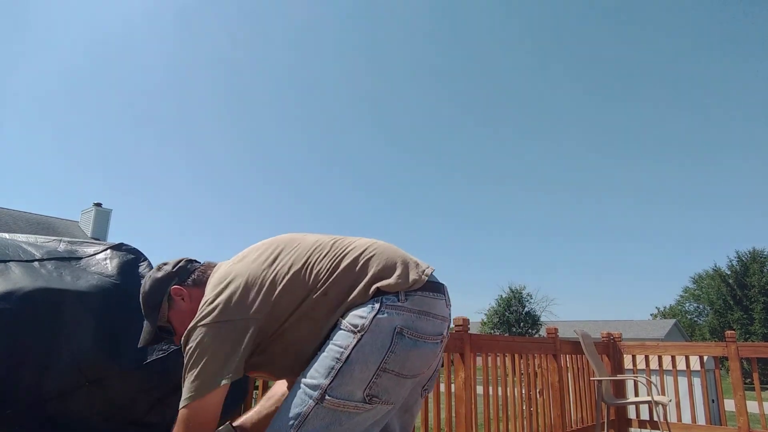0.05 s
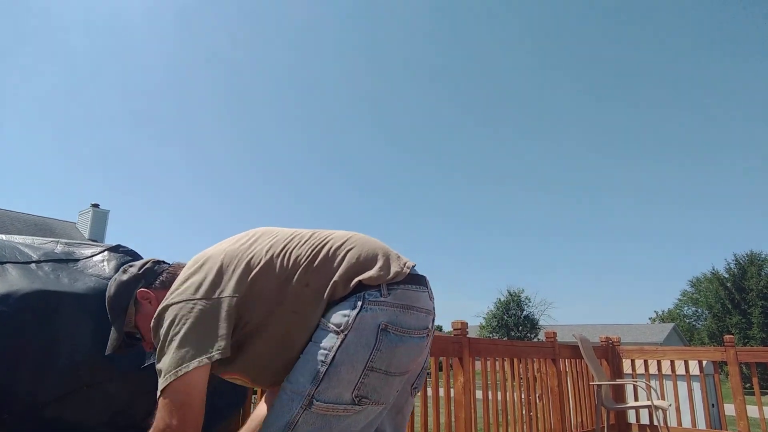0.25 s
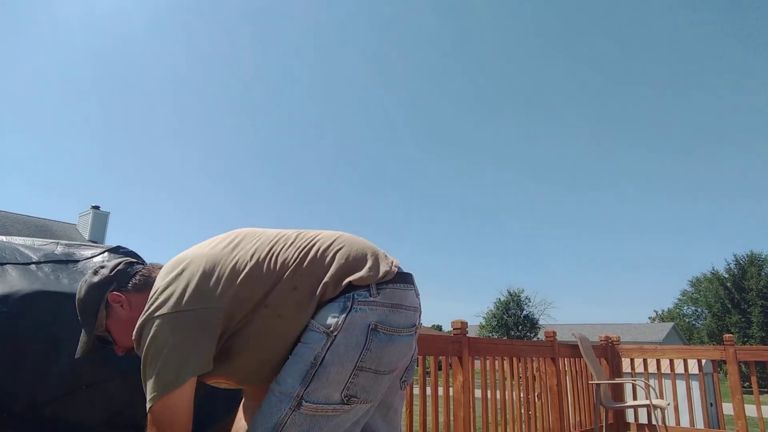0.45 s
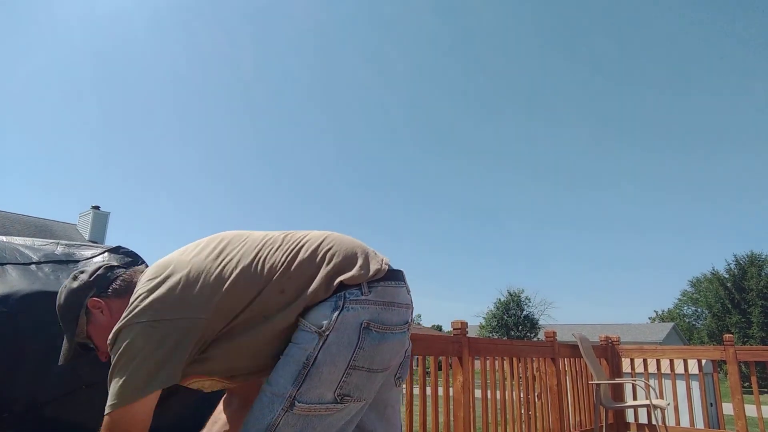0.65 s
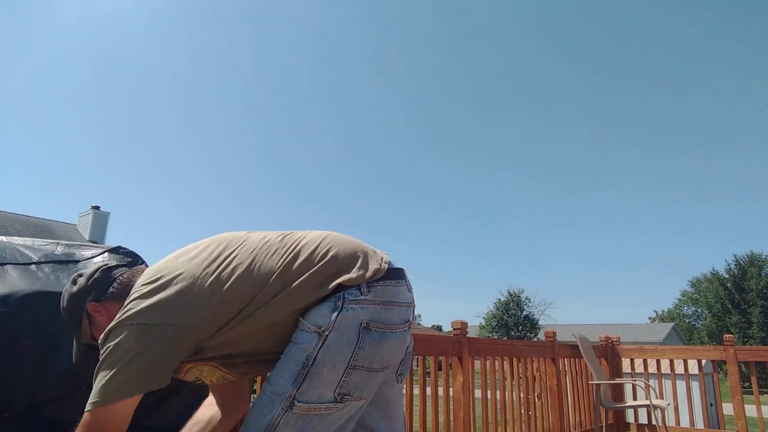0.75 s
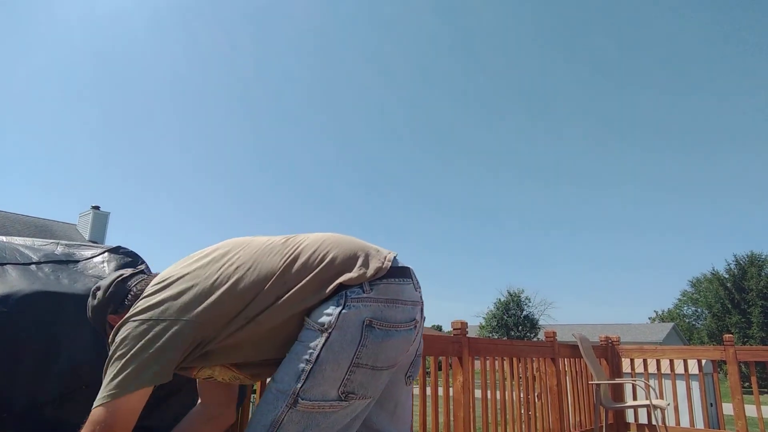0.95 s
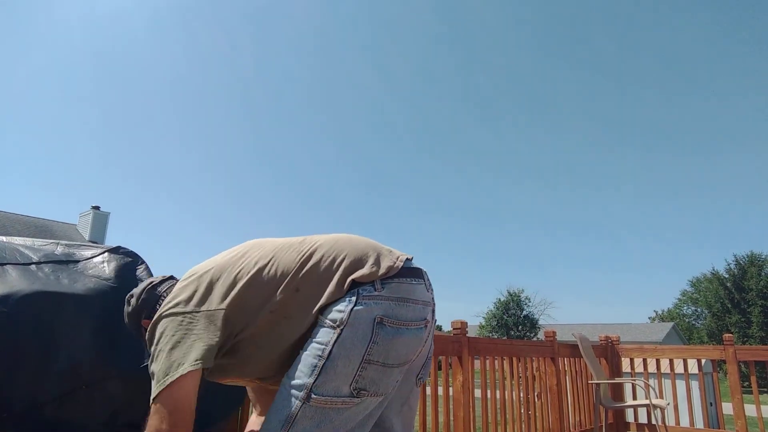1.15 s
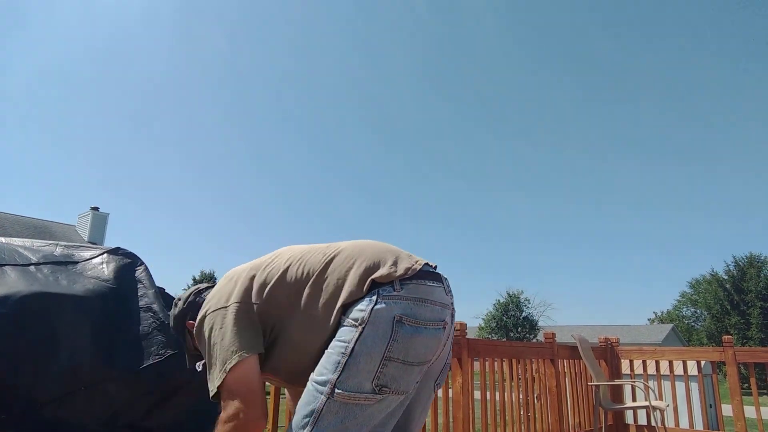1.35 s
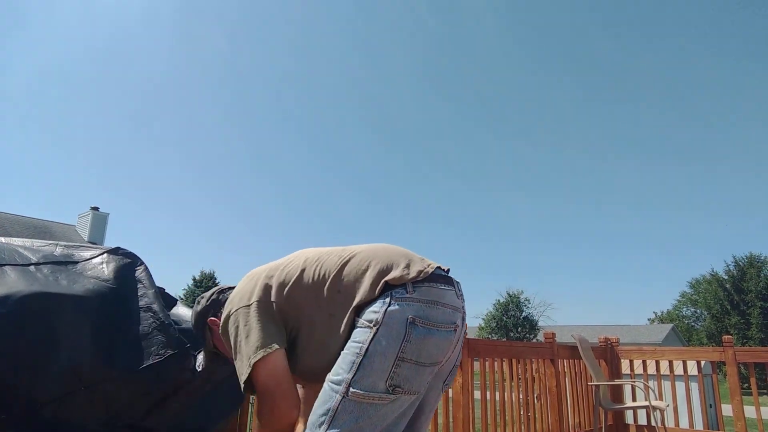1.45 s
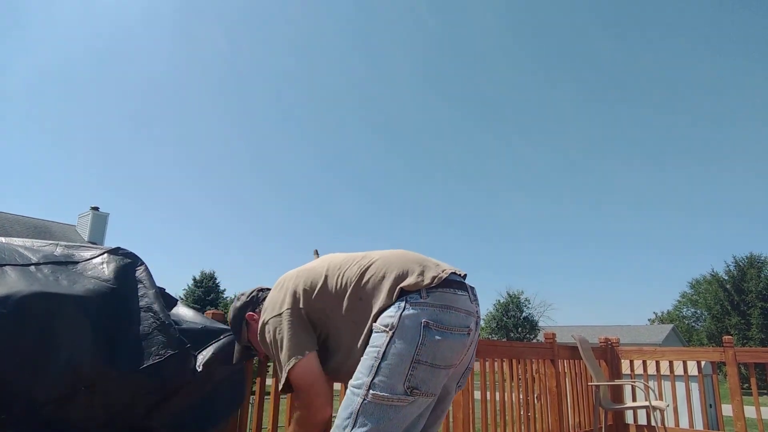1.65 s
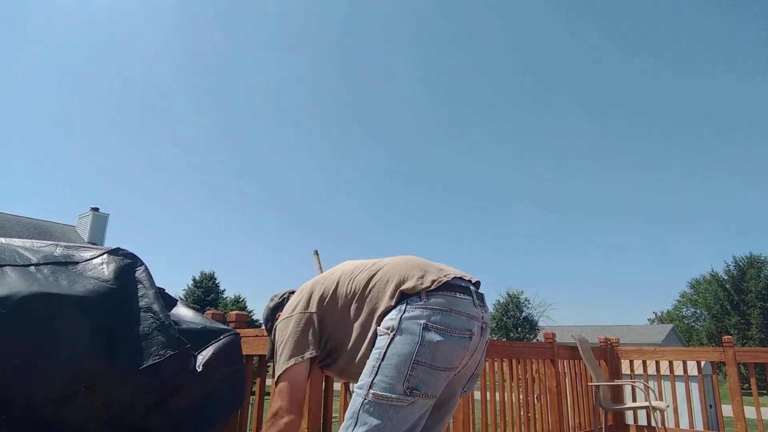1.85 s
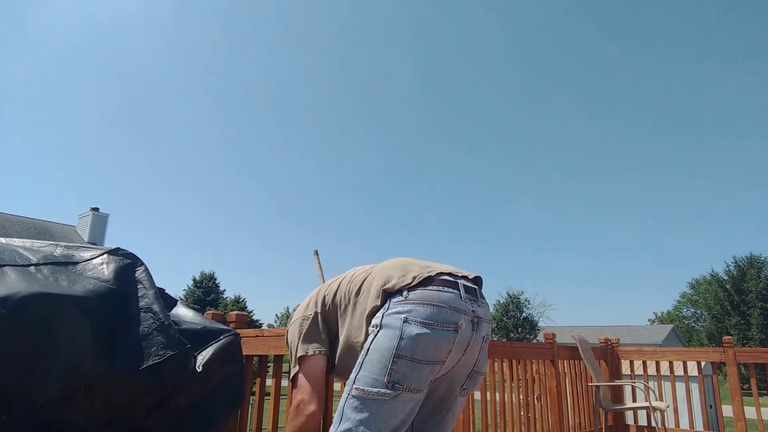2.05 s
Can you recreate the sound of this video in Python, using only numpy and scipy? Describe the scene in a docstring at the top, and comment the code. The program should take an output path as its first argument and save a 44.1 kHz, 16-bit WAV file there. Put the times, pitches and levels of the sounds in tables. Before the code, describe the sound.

A heavy metal drum knocks and rumbles across wooden deck boards outdoors, with faint bird chirps

```python
"""A heavy metal drum is tipped and rolled over wooden deck boards outdoors.
Its rim knocks are clicked resonators with noise tails, bright cracks and short snaps.
Between knocks it rumbles (randomly shaken deck modes, low noise) and scrapes (coloured fine grains).
Birds chirp far off as blurred gliding tones over a soft noise of air.
Two microphone ports are cross-fed with a short delay into left and right."""
import sys
import numpy as np
from scipy import signal
from scipy.fft import rfft, irfft
from scipy.io import wavfile

SR = 44100
rng = np.random.default_rng(int(sys.argv[2]) if len(sys.argv) > 2 else 0)


def wav_out(sig):
    """Save sig, one row per channel (or a flat mono array), as 16-bit PCM at SR to the path in sys.argv[1]."""
    wavfile.write(sys.argv[1], SR, np.round(np.clip(np.atleast_2d(sig).T, -1, 1) * 32767).astype(np.int16))


def voltage_ratio(decibels):
    """Convert decibels (scalar or array-like) to amplitude ratios, 20 dB per decade."""
    exponent = np.asarray(decibels, float) / 20
    return 10 ** exponent


N = 92610

# rim knocks on the boards, before each layer's own trim:
# (t/s, level/dB, crack re knock/dB, tilt/dB per octave, favoured pitch f/Hz)
KNOCKS = [(0.222, -5, -20.5, 0.5, 272), (0.261, -17, -14, 1.5, 272), (0.291, -15.5, -30, -2.5, 483),
          (0.316, -11, -32, 1, 850), (0.331, -15, -22, -2, 295), (0.391, -24.5, -48, -1, 540),
          (0.414, -45, -36, -10, 470), (0.577, -31.5, -25, -6, 180), (1.011, -47, -30, 6, 167),
          (1.098, -45.5, -30, -11.5, 159), (1.162, -26, -24.5, -6, 480), (1.186, -8, -50, 1.3, 480),
          (1.199, -3, -24, 2.5, 290), (1.249, -15.5, -20, -1.5, 475), (1.309, -25, -22, -5.5, 192),
          (1.355, -27, -52, -3.5, 630), (1.595, -18.5, -9, 6, 490), (1.607, -13, -33, 0.5, 294),
          (1.63, -12.5, -11, 5.5, 670), (1.654, -4.5, -23.5, -0.5, 257), (1.664, -7.5, -27, 2.2, 607),
          (1.679, -15.5, -44, -5.5, 316), (1.710, -17.5, -33, 4.5, 670), (1.719, -13, -30, -3.5, 600),
          (1.778, -7.5, -17, 0, 607), (1.788, -5, -22, -0.5, 270), (1.804, -17, -12.5, -3.5, 272),
          (1.862, -19, -37, -3.5, 383), (1.888, -21, -22.5, -4, 575), (1.946, -26, -13.5, 4.5, 264)]
# resonances of boards and drum together: (f/Hz, relative level/dB, t60/s)
DECK_MODES = [(62.6, -25.5, 0.67), (92.44, -8.5, 0.68), (153, -21.5, 0.45), (186.8, -2, 0.089),
              (272, -3.5, 0.12), (354, -13.5, 0.37), (414, -8, 0.12), (505.4, -5, 0.06), (598, -7.5, 0.051),
              (692.7, -9.5, 0.072), (833, -6.5, 0.021), (977, -3.5, 0.028), (932, -8.5, 0.011),
              (1215, -7.5, 0.03), (1313, -3, 0.022), (1508, -10.5, 0.07)]
# second port against first: (f/Hz, likeness 0..1, level/dB, cross-feed gain 0..1)
PORTS = [(40, 0.7, -6.5, 1), (110, 0.7, -2.5, 0.78), (272, 0.96, -2.5, 0.81), (560, 0.58, 2.5, 0.91),
         (1700, 0.043, 0.5, 1), (3350, 0.02, 3.5, 0.48), (5270, 0.011, 6, 0.78), (9800, 0.021, -2.5, 0.55),
         (17000, 0.075, -8, 0.29)]
TILT_HZ = 480  # pivot of every knock's tilt
BUILD_S = 0.00136  # knock, tail and crack start this long after the table time


def rms_one(x):
    """Scale to rms 1."""
    return x / np.sqrt(np.mean(x ** 2) + 1e-20)


def at_hz(points, hz, axis=1):
    """Read a table column at hz, interpolating over log frequency."""
    points = np.array(points)
    return np.interp(np.log(hz), np.log(points[:, 0]), points[:, axis])


def in_time(rows):
    """Gain curve through (t/s, level/dB) points, straight in dB."""
    s, db = np.transpose(rows)
    return voltage_ratio(np.interp(np.arange(N) / SR, s, db))


def spectrum_hz():
    """Frequencies of the whole-length spectrum, floored at 10 Hz."""
    return np.maximum(np.fft.rfftfreq(N, 1 / SR), 10)


def colour(x, points):
    """Shape steady noise by a (f/Hz, level/dB) table; rms 1."""
    return rms_one(irfft(rfft(x) * voltage_ratio(at_hz(points, spectrum_hz())), N))


def ring(clicks, hz, t60):
    """A two-pole resonator: a unit click sets a sine ringing from height 1; t60 is at least 5 ms."""
    r = voltage_ratio(-60 / (max(t60, 0.005) * SR))
    w = 2 * np.pi * hz / SR
    return signal.lfilter([0, np.sin(w)], [1, -2 * r * np.cos(w), r * r], clicks + 1e-18)


def grains(per_s):
    """Random clicks of uneven size and either sign, two unrelated draws."""
    size_db = 3 * np.minimum(rng.exponential(1, (2, N)), 5)
    sizes = voltage_ratio(size_db) * rng.choice([-1, 1], (2, N))
    return sizes * (rng.random((2, N)) < per_s / SR)


def dying(starts, t60):
    """Envelope that jumps at each (t/s, level/dB), then dies exponentially, powers adding."""
    power = np.zeros(N)
    for s, db in starts:
        power[int(s * SR)] += voltage_ratio(2 * db)
    decay = voltage_ratio(-120 / (max(t60, 0.003) * SR))
    return np.sqrt(signal.lfilter([1], [1, -decay], power + 1e-18))


def air():
    """Soft steady air noise."""
    # spectrum: (f/Hz, relative level/dB)
    air_colour = [(30, -10), (100, 17), (300, -6), (1000, -6.5), (2500, -19), (5000, -31.5), (9000, -26),
                  (16000, -19)]
    return voltage_ratio(-57) * colour(rng.standard_normal((2, N)), air_colour)


def birds():
    """Far chirps: gliding tones blurred by echoes into narrow noise."""
    # (start t/s, length/s, start f/Hz, end f/Hz, level/dB, blur width/Hz)
    chirps = [(0, 0.096, 3360, 3156, -45.5, 400), (0.569, 0.06, 4800, 4830, -63.5, 110),
              (0.609, 0.065, 3380, 3400, -61.5, 110), (0.647, 0.051, 3680, 4000, -59, 141),
              (1.563, 0.041, 3900, 5280, -56.5, 303)]
    clear_hz = 70  # a chirp this narrow keeps as much steady tone as blur
    out, t = np.zeros((2, N)), np.arange(N) / SR
    for start, length, hz0, hz1, db, width_hz in chirps:
        progress = np.clip((t - start) / length, 0, 1)
        lowpass = signal.butter(2, width_hz, fs=SR, output="sos")
        blur = rms_one(signal.sosfilt(lowpass, rng.standard_normal((2, N))))
        swell = voltage_ratio(db) * np.sin(np.pi * progress)
        glide_hz = hz0 + (hz1 - hz0) * progress
        tone = np.sin(2 * np.pi * np.cumsum(glide_hz) / SR)
        out += swell * (clear_hz / width_hz + blur) * tone
    return out


def rolling():
    """Uneven contacts shake the deck modes; a low lumpy rumble swells below."""
    # level of the shaken modes: (t/s, level/dB)
    roll_level = [(0.0, -52.5), (0.39, -48), (0.64, -55.5), (0.78, -58), (1.05, -61.5), (1.25, -40.5),
                  (1.64, -62.5), (1.77, -29), (1.79, -36.5), (1.92, -44), (2.0, -49.5), (2.1, -47)]
    # low rumble before its trim: (t/s, level/dB)
    boom_level = [(0.0, -45.5), (0.2, -48), (0.23, -40), (0.3, -45.5), (0.33, -33), (0.42, -52.5),
                  (0.95, -61), (0.97, -48), (1.02, -41.5), (1.04, -45), (1.16, -44.5), (1.19, -39.5),
                  (1.32, -63), (1.44, -65), (1.57, -65), (1.64, -67), (1.66, -49), (1.78, -38.5),
                  (2.1, -60)]
    # spectrum of the low rumble: (f/Hz, relative level/dB)
    boom_colour = [(20, -41), (45, 1.5), (100, 5), (170, -3), (300, -25), (1000, -45.5)]
    contacts = grains(250)  # per second
    rumble = 0
    for k, (hz, db, t60) in enumerate(DECK_MODES[3:]):
        # here each mode rings half as long
        rumble = rumble + (-1) ** k * voltage_ratio(db) * ring(contacts, hz, 0.5 * t60)
    boom = voltage_ratio(6.5) * in_time(boom_level) * colour(rng.standard_normal((2, N)), boom_colour)
    return in_time(roll_level) * rms_one(rumble) + boom


def scraping():
    """Fine grit under the rim: quick attack, hold, release; with a faint treble hiss."""
    # (start t/s, hold from start/s, level/dB, release/dB per s)
    scrapes = [(0.217, 0.077, -47.5, 165), (0.295, 0.045, -44.5, 281), (1.182, 0.047, -39.5, 176),
               (1.598, 0.044, -33.5, 202), (1.704, 0.033, -46.5, 97), (1.763, 0.037, -43, 175),
               (1.919, 0.012, -55, 179), (2.027, 0.0081, -73, 295), (2.069, .03, -52.5, 197)]
    # spectrum from 1500 Hz up: (f/Hz, relative level/dB)
    grit_colour = [(1500, 5), (3000, 5), (5000, -3), (9000, -14.5), (13000, -3), (16000, -6.5)]
    # treble hiss, three stretches joined: (t/s, level/dB)
    hiss_level = [
        [(0.0, -49), (0.038, -61), (0.2, -53)],
        [(0.45, -63.5), (0.708, -64.5), (1.048, -61.5), (1.15, -58)],
        [(1.33, -68), (1.38, -71), (1.47, -66.5), (1.58, -62)],
    ]
    attack_s = 0.01
    t, level = np.arange(N) / SR, np.zeros(N)
    for start, hold, db, release_db in scrapes:
        attack = np.clip((t - start) / attack_s, 0, 1)
        level += attack * voltage_ratio(db - release_db * np.maximum(t - start - hold, 0))
    grit = colour(grains(2500), [(600, 11)] + grit_colour)
    hiss = colour(rng.standard_normal((2, N)), [(600, 9.3)] + grit_colour)
    return level * grit + in_time(sum(hiss_level, [])) * hiss


def tails():
    """Dense ringing after the knocks: half-octave noise bands, each swelling in and dying at its own speed."""
    # band levels before the trim: (f/Hz, level/dB)
    tail_level = [(40, -2), (100, 2), (300, 2.5), (700, -7.5), (1500, -12), (2500, -36), (6000, -41),
                  (16000, -55.5)]
    # decay: (f/Hz, t60/s)
    tail_t60 = [(40, 0.44), (160, 0.49), (420, 0.25), (1100, 0.12), (3000, 0.2), (16000, 0.031)]
    rise_cycles = 0.93  # slower swell in lower bands
    edges = 35 * 2 ** np.arange(0, 9, 0.5)
    white = rng.standard_normal((2, 2, N))  # neighbouring bands take unrelated noise
    out = 0
    for k, (low, high) in enumerate(zip(edges, edges[1:])):
        hz = np.sqrt(low * high)
        bandpass = signal.butter(2, [low, high], "band", fs=SR, output="sos")
        band = signal.sosfilt(bandpass, white[k % 2])
        octaves = np.log2(hz / TILT_HZ)
        starts = [(s + BUILD_S, db + tilt_db * octaves) for s, db, _, tilt_db, _ in KNOCKS]
        level = dying(starts, at_hz(tail_t60, hz))
        r = np.exp(-2 * hz / (rise_cycles * SR))
        swell = signal.lfilter([(1 - r) ** 2], [1, -2 * r, r * r], level)
        out = out + voltage_ratio(at_hz(tail_level, hz)) * band * swell
    return voltage_ratio(-0.9) * out


def cracks():
    """Bright noise bursts at all but the dull, low-pitched knocks."""
    # spectrum: (f/Hz, relative level/dB)
    crack_colour = [(1500, -1), (3000, 13.5), (5000, -8), (9000, -17), (13000, -14), (16000, -37)]
    dull_hz, crack_db, t60_s = 230, -3, 0.015
    starts = [(s + BUILD_S, db + rel_db + crack_db) for s, db, rel_db, _, hz in KNOCKS if hz > dull_hz]
    return dying(starts, t60_s) * colour(rng.standard_normal((2, N)), crack_colour)


def rim_ticks():
    """Rim ticks, some close to knocks, some apart: dying bursts of treble noise."""
    # (t/s, starting level/dB, t60/s)
    ticks = [(0.264, -41, .04), (0.327, -37.5, 0.07), (0.5184, -57.5, 0.04), (1.2695, -36, 0.013),
             (1.5243, -54, 0.014), (1.5986, -29, .031), (1.638, -28.5, 0.024), (1.811, -40, 0.017),
             (2.0188, -44.5, 0.025), (2.035, -55, 0.045)]
    # spectrum: (f/Hz, relative level/dB)
    tick_colour = [(1500, -12), (4000, -3.5), (6000, -0.5), (10000, -8), (16000, -0.5)]
    level = sum(dying([(s, db)], t60) for s, db, t60 in ticks)
    return level * colour(rng.standard_normal((2, N)), tick_colour)


def snaps():
    """Some blows snap: a sharp click into a few very short rim modes, alike in both rows."""
    # (t/s, click level/dB, pitch factor)
    blows = [(0.2221, -5.5, 1), (.318, -22, 0.97), (1.1984, -4.5, 0.82), (1.5971, -19.5, 0.86),
             (1.6351, -26.5, 1.29), (1.661, -14.5, 0.53), (1.7911, -16, 1.024)]
    # rim modes at pitch factor 1: (f/Hz, relative level/dB, t60/s)
    rim_modes = [(497, -3, 0.024), (960, -13, 0.0047), (1154, -1, 0.01), (1540, -19.5, 0.0095),
                 (2270, -13, 0.0042), (3590, -32.5, 0.0041)]
    dull_db = 6  # per octave of pitch factor and kHz: deeper snaps are duller
    out = np.zeros(N)
    for s, db, factor in blows:
        click = -voltage_ratio(db) * (np.arange(N) == int(s * SR))
        for hz, mode_db, t60 in rim_modes:
            gain = voltage_ratio(mode_db + dull_db * np.log2(factor) * hz / 1000)
            out += gain * ring(click, hz * factor, t60)
    return signal.sosfilt(signal.butter(2, 4500, fs=SR, output="sos"), out)


def knocks():
    """Each knock is a soft click into every mode; the modes near its favoured pitch are boosted."""
    contact_hz = 1510  # lowpass that softens the click
    knock_db, spread_db, favour_db, favour_octaves = -13, 1, 9, 0.26
    out, size = np.zeros((2, N + SR)), SR // 2
    click = signal.lfilter(*signal.butter(2, contact_hz, fs=SR), np.arange(size) == 0)
    rings = np.array([voltage_ratio(db) * ring(click, hz, t60) for hz, db, t60 in DECK_MODES])
    hz = np.array(DECK_MODES)[:, 0]
    signs = (-1) ** np.arange(len(hz))
    for s, db, _, tilt_db, favoured_hz in KNOCKS:
        tilt = tilt_db * np.log2(hz / TILT_HZ)
        favour = favour_db * np.exp(-(np.log2(hz / favoured_hz) / favour_octaves) ** 2)
        gain = voltage_ratio(db + knock_db + tilt + favour)
        # row 0 varies each mode slightly; row 1 draws its strength and sign afresh
        own = rng.standard_normal((2, len(hz)))
        rows = np.array([voltage_ratio(spread_db * own[0]) * signs, own[1]])
        start = int((s + BUILD_S) * SR)
        out[:, start:start + size] += (gain * rows) @ rings
    return out[:, :N]


def scene():
    """Row 0 is the first port; row 1 mixes it with the other, mostly unrelated row for the second port."""
    drum = knocks() + snaps() + rim_ticks() + cracks() + tails() + scraping() + rolling()
    first, other = drum + birds() + air()
    hz = spectrum_hz()
    alike = np.clip(at_hz(PORTS, hz, axis=1), -1, 1)
    blend = alike * rfft(first) + np.sqrt(1 - alike ** 2) * rfft(other)
    second = voltage_ratio(at_hz(PORTS, hz, axis=2)) * blend
    return np.array([first, irfft(second, N)])


def low_pass(x):
    """Removes everything above the highest recorded frequency."""
    return signal.sosfilt(signal.butter(12, 16660, fs=SR, output="sos"), x)


def record(dry):
    """Each side is its port minus the delayed other port; peaks clip at full scale."""
    feed_lag_s = 0.0004573
    hz = spectrum_hz()
    delay = np.exp(-2j * np.pi * hz * feed_lag_s)
    feed = np.clip(at_hz(PORTS, hz, axis=3), 0, 1) * delay
    sides = dry - irfft(feed * rfft(dry[::-1]), N)
    return low_pass(np.clip(sides, -1, 1))


dry = scene()
out = record(dry)
wav_out(out)
```